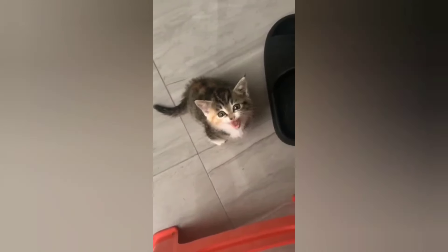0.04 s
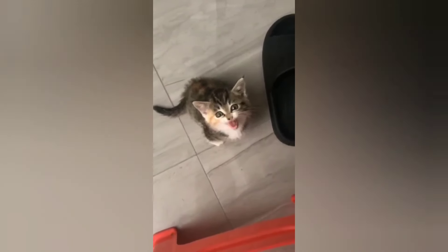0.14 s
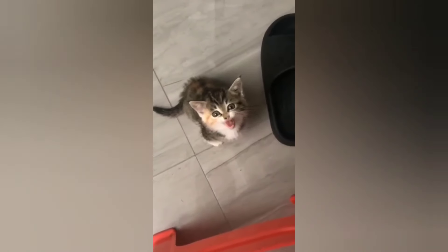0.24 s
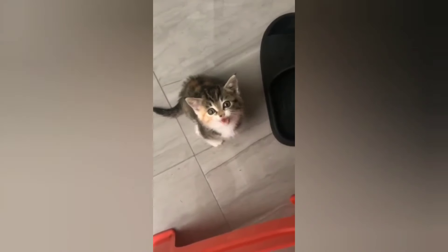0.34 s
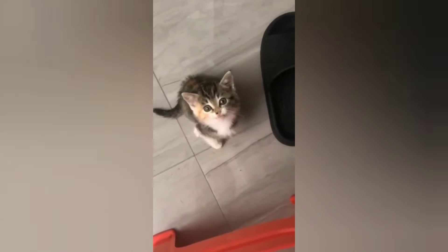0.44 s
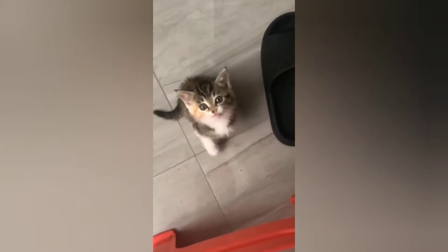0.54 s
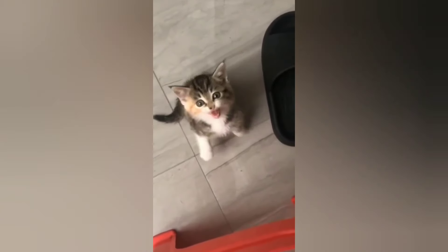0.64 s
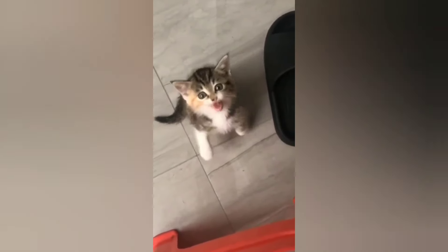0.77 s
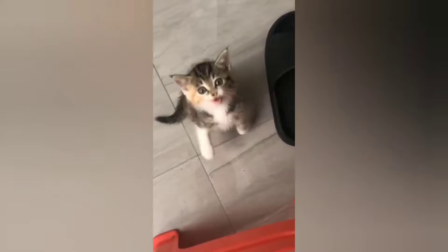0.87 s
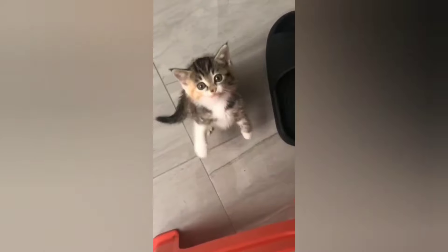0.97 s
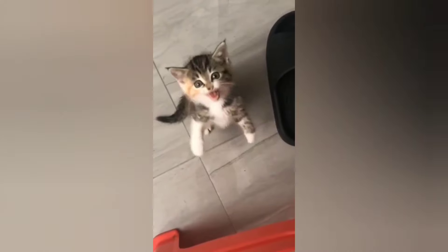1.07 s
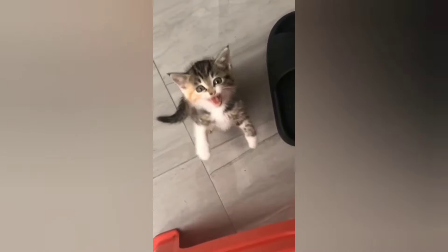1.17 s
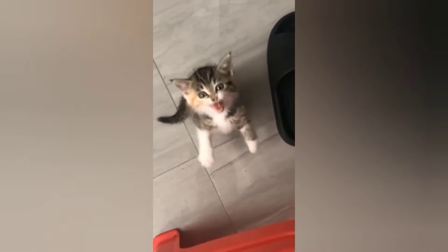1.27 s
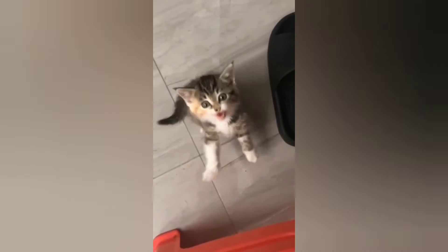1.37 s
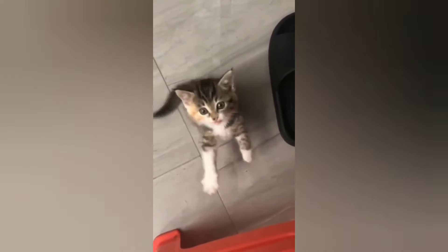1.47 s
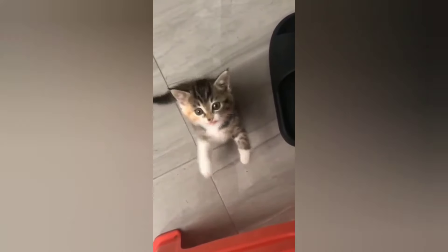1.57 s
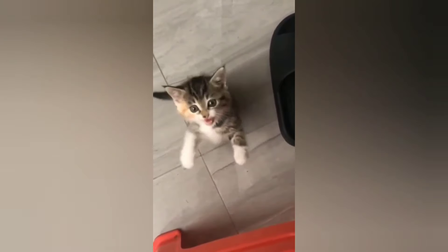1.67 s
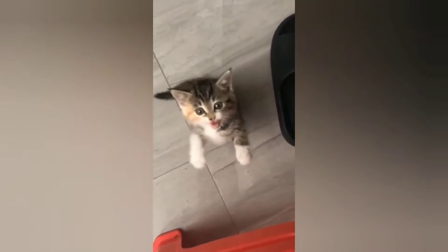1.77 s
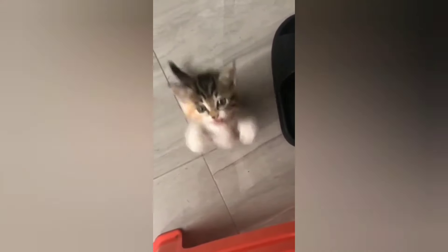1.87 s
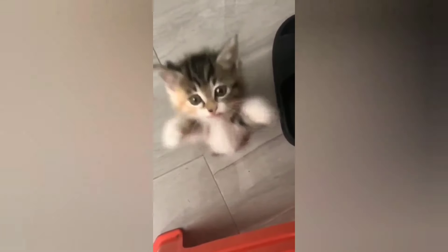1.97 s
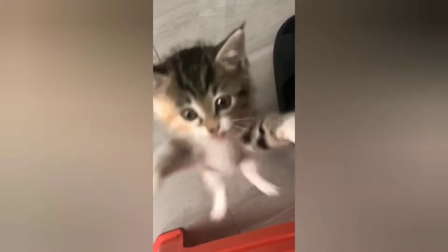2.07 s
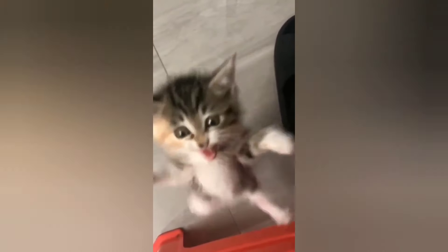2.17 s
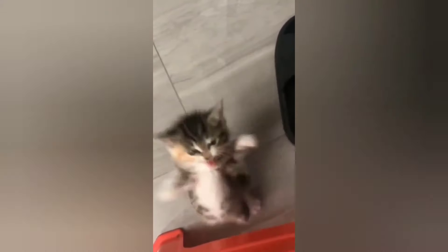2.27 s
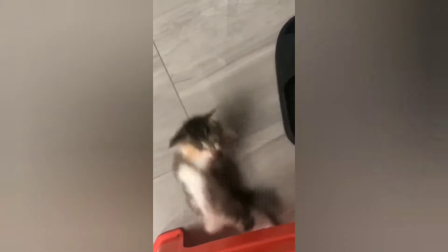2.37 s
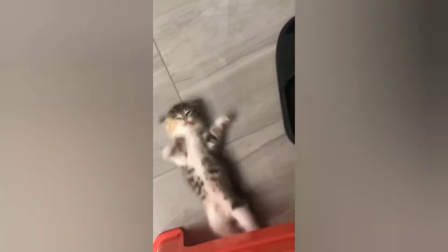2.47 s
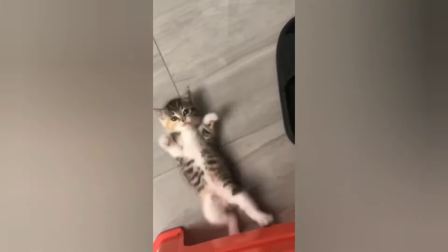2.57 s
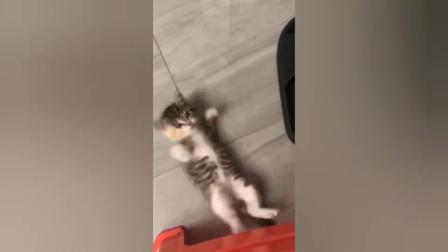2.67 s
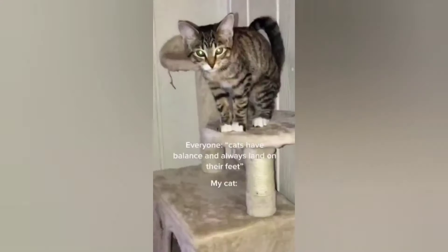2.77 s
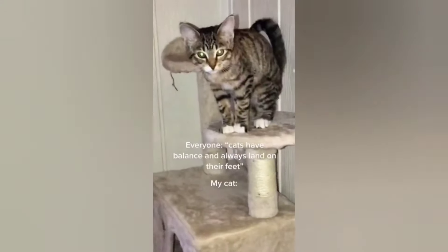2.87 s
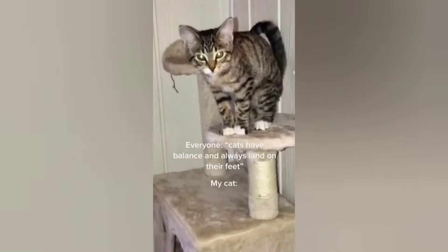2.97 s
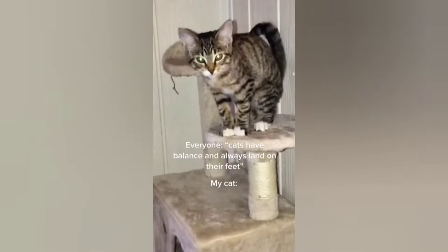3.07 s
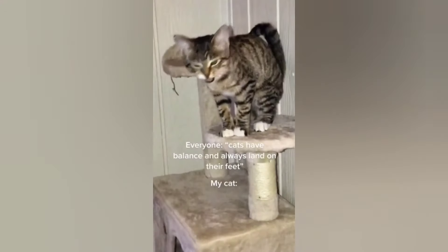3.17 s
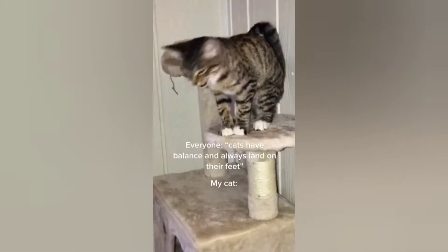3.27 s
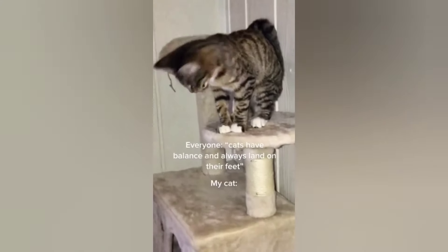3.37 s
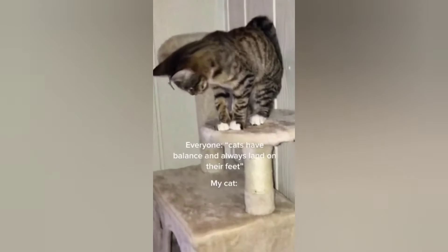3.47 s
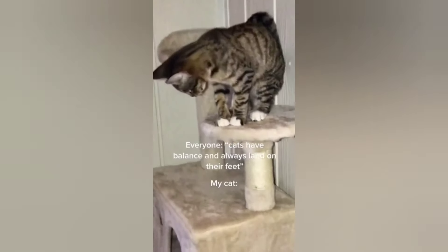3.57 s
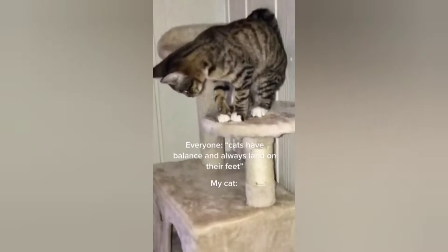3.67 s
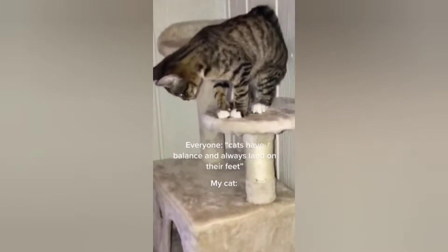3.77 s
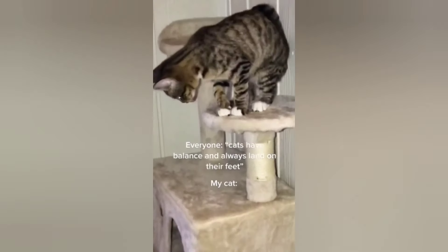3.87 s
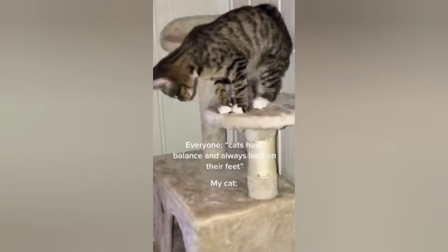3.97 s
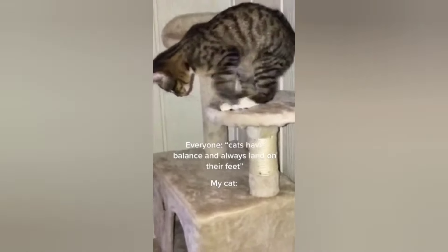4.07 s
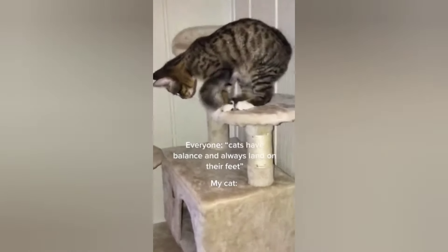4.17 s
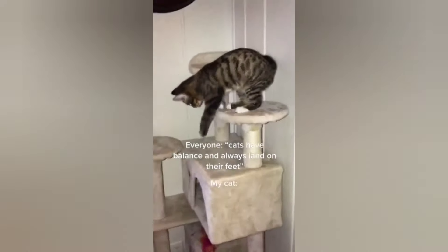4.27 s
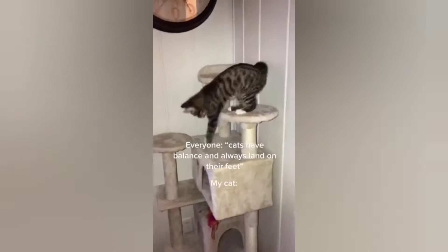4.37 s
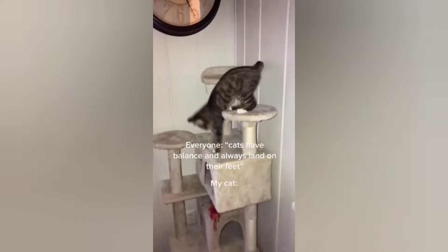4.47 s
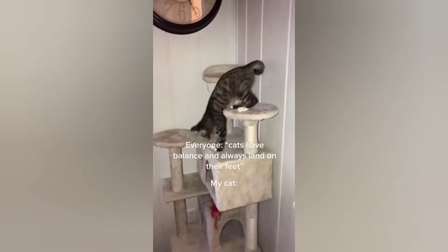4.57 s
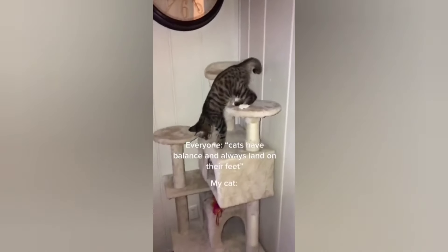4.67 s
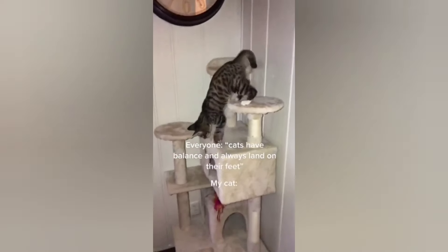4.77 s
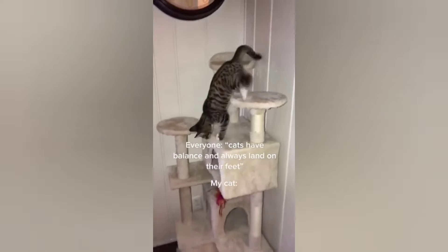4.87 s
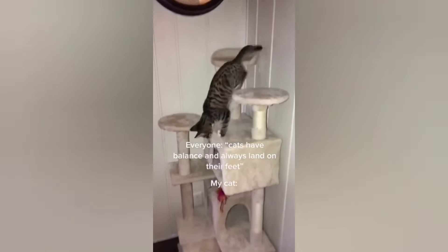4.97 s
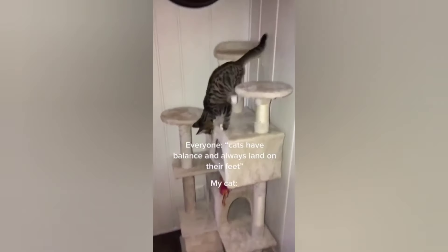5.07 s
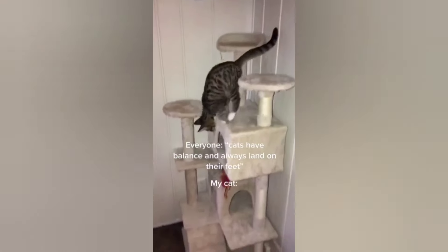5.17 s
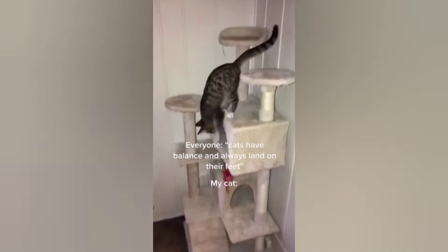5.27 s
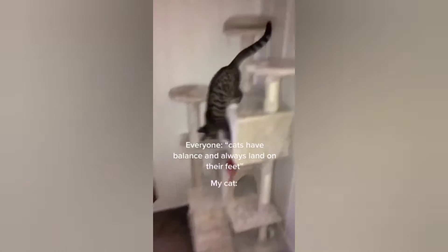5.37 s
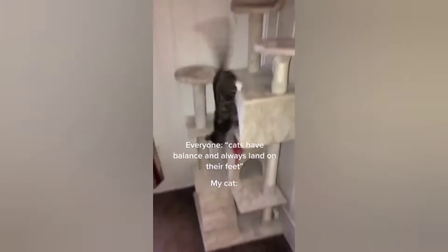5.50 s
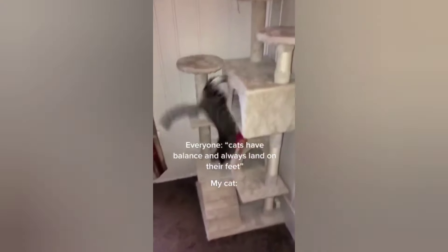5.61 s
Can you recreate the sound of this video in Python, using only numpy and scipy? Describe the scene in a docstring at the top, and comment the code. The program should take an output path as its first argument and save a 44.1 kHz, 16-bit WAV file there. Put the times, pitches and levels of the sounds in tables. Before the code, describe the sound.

Close to the microphone in a lively tiled room, a kitten gives five short, high mews, the last loudest and cracking, and lands with a soft thump. The sound cuts to a quieter, drier room: one faint cat meow, a slight rustle, then a burst of padded knocks and claw scrapes.

```python
"""A kitten close to the microphone on a tiled floor mews five times, leaps and lands with a soft thump.
The scene cuts to a quieter room: a grown cat meows once, faintly, shifts on a carpeted tower and knocks it.
Voices are overtones shaped by jaw, tongue and fixed resonances, with breath noise on each vocal cycle.
Blows are decaying sines with a crack of noise, and fur and claws are bursts of uneven noise.
Each room adds a floor bounce, a dying tail and coloured noise; one microphone, mono."""
import sys
import numpy as np
from scipy import signal
from scipy.fft import rfft, irfft
from scipy.io import wavfile
from scipy.ndimage import uniform_filter1d

SR = 44100
rng = np.random.default_rng(int(sys.argv[2]) if len(sys.argv) > 2 else 0)


def how_loud(loudness_db):
    """Turn decibels into a plain amplitude multiplier (0 dB gives 1, 20 dB gives 10)."""
    steps = np.asarray(loudness_db, float) / 20
    return 10 ** steps


def transcribe(signal):
    """Save signal, clipped to [-1, 1], as a 16-bit WAV file at the path in sys.argv[1]."""
    frames = np.atleast_2d(signal).T
    limited = np.clip(frames, -1, 1)
    pcm = np.round(limited * 32767).astype(np.int16)
    wavfile.write(sys.argv[1], SR, pcm)


N = 248724


def rms_one(x):
    """Scale to unit power."""
    return x / np.sqrt(np.mean(x ** 2) + 1e-20)


def at_hz(points, hz):
    """Read the second column of a frequency table on a log frequency axis."""
    table_hz, value = np.transpose(points)
    return np.interp(np.log(hz + 1), np.log(table_hz), value)


def band(x, low_hz, high_hz):
    """Butterworth band-pass."""
    return signal.sosfilt(signal.butter(2, [low_hz, high_hz], "band", fs=SR, output="sos"), x)


def wobble(hz, size):
    """Slow random drift: noise low-passed at hz, scaled to unit power."""
    settle = 4000                                  # samples dropped while the filter settles
    noise = rng.standard_normal(size + settle)
    slow = signal.sosfilt(signal.butter(2, hz, fs=SR, output="sos"), noise)
    return rms_one(slow[settle:])


def peak(hz, centre_hz, width_hz):
    """Gain of one resonance, 1 at its centre."""
    return 1 / np.sqrt(1 + ((hz ** 2 - centre_hz ** 2) / (hz * width_hz)) ** 2)


def room_tone(spectrum, db, flicker_db):
    """The empty room at the microphone: coloured noise whose level flickers a little."""
    colour = how_loud(at_hz(spectrum, np.fft.rfftfreq(N, 1 / SR)))
    noise = irfft(rfft(rng.standard_normal(N)) * colour, N)
    return how_loud(db + flicker_db * wobble(1.9, size=N)) * rms_one(noise)


def room(x, t60, wet_db, floor_ms, floor_db):
    """Direct sound, a bounce off the floor, then octave bands of dying noise from the walls."""
    t = np.arange(SR) / SR
    response = 0
    for low_hz in 40 * 2. ** np.arange(9):
        noise = band(rng.standard_normal(SR), low_hz, min(2 * low_hz, 20000))
        response = response + noise * how_loud(-60 * t / at_hz(t60, np.sqrt(2) * low_hz))
    response *= np.clip(t / 0.0015 - 1, 0, 1)      # walls answer late
    response *= how_loud(wet_db) / np.sqrt(np.sum(response ** 2))
    response[0] += 1                               # direct path to the microphone
    response += how_loud(floor_db) * np.sinc(np.arange(SR) - floor_ms * SR / 1000)
    return signal.fftconvolve(x, response)[:N]


# Noise colour of the quiet room: (frequency [Hz], relative density [dB per Hz])
QUIET_ROOM_TONE = [(15, -21), (25, -22.5), (61, 3.5), (77, -7), (86, -13), (133, 3.5), (240, -10),
                   (274, 1.5), (305, -12.5), (331, -5), (482, -14.5), (722, -18), (782, -21.5),
                   (848, -19.5), (15500, -42)]
# Reverberation of the quiet room: (frequency [Hz], time to fall 60 dB [s])
QUIET_ROOM_T60 = [(250, 0.24), (1500, 0.66), (12000, 0.076)]


def quiet_room(sounds):
    """The cat's room: its tail dies fastest in the treble, over a low room tone."""
    heard = room(sounds, QUIET_ROOM_T60, wet_db=-14.0, floor_ms=0.9, floor_db=-23.0)
    return heard + room_tone(QUIET_ROOM_TONE, db=-66, flicker_db=.5)


# Noise colour of the tiled room: (frequency [Hz], relative density [dB per Hz])
TILED_ROOM_TONE = [(15, -37), (25, -13), (75, 7), (160, -9.5), (240, -3), (445, -14.5), (848, -17.5),
                   (945, -17.5), (1380, -23.5), (1900, -22.5), (2230, -39), (3000, -27.5), (3530, -28),
                   (15500, -44.5)]
# Reverberation of the tiled room: (frequency [Hz], time to fall 60 dB [s])
TILED_ROOM_T60 = [(250, 1), (1500, 0.75), (5000, 0.72), (9000, 0.46), (15000, 0.4)]


def tiled_room(sounds):
    """The kitten's room: a longer tail than the cat's at most pitches, over a louder room tone."""
    heard = room(sounds, TILED_ROOM_T60, wet_db=-13.5, floor_ms=1.2, floor_db=-21.0)
    return heard + room_tone(TILED_ROOM_TONE, db=-55, flicker_db=.5)


# Fur and claws brushing in both rooms:
# (time [s], time scale [s], level [dB], low edge [Hz], high edge [Hz])
FUR_BRUSHES = [(2.384, 0.022, -65.5, 926, 13520), (3.929, 0.075, -77, 782, 5780),
               (5.363, 0.095, -76, 1500, 11690), (5.436, 0.025, -65.5, 1200, 5970),
               (5.454, 0.007, -51, 1300, 5095), (5.469, 0.026, -62, 250, 2200),
               (5.505, 0.0063, -56, 3000, 9400), (5.53, 0.056, -68.5, 2500, 6750),
               (5.583, 0.014, -63, 2500, 6330), (5.603, 0.021, -66, 2480, 7880)]


def brushes():
    """Fur and claws brush: dense uneven grains of noise under a quick rise and slower fall."""
    out = np.zeros(N)
    for s, length_s, db, low_hz, high_hz in FUR_BRUSHES:
        u = np.arange(0, 3, 1 / (length_s * SR))   # time in units of the time scale
        unevenness = how_loud(2.4 * wobble(450, size=SR)[:len(u)])
        grains = rng.standard_normal(SR)[:len(u)] * unevenness
        swell = 2 * np.e * u * np.exp(-2 * u)
        brush = how_loud(db) * swell * rms_one(band(grains, low_hz, high_hz))
        at = round(s * SR)
        out[at:at + len(u)] += brush[:N - at]
    return out


def blows(events, modes, crack_db, crack_t60, low_hz):
    """Each padded blow strikes every mode with a strength of its own; a short crack of noise goes with it."""
    out, t = np.zeros(N), np.arange(SR // 2) / SR
    spread_db = 3 * rng.standard_normal((len(events), len(modes)))
    # a loose frame never rings twice alike
    detune = 1 + 0.0703 * rng.standard_normal((len(events), len(modes)))
    cracks = rng.standard_normal((len(events), len(t))) * how_loud(crack_db - 60 * t / crack_t60)
    for (s, db, hard_hz), own_db, own_tune, crack in zip(events, spread_db, detune, cracks):
        ring = 0
        for (hz, mode_db, t60), offset_db, tune in zip(modes, own_db, own_tune):
            ring = ring + how_loud(mode_db + offset_db - 60 * t / t60) * np.sin(2 * np.pi * hz * tune * t)
        soft = signal.butter(4, hard_hz, fs=SR, output="sos")   # a soft paw dulls the blow
        at = round(s * SR)
        out[at:at + len(t)] += how_loud(db) * signal.sosfilt(soft, ring + crack)[:N - at]
    # the blows carry no deep bass
    return signal.sosfilt(signal.butter(4, low_hz, "high", fs=SR, output="sos"), out)


# Blows on the carpeted tower: (time [s], level [dB], hardness as low-pass corner [Hz])
TOWER_KNOCKS = [(5.39, -52.5, 304), (5.5085, -28.5, 2500), (5.512, -32, 1900), (5.516, -24.5, 1500),
                (5.526, -40.5, 1200), (5.534, -41.5, 1060), (5.543, -30.5, 990), (5.572, -35, 383)]
# Ringing of the tower: (nominal frequency [Hz], mean level [dB], time to fall 60 dB [s])
TOWER_RINGING = [(146.4, -5, 0.09), (170, -5.5, 0.11), (258, -12, 0.57), (320, -5.5, 0.038),
                 (379, -5.5, 0.087), (485, -1, 0.095), (694, -5.5, 0.03), (770, -19.5, 0.043),
                 (920, -7, 0.033), (1140, -3, 0.029), (1500, -12, 0.065), (1900, -11.5, 0.03)]


def tower_knocks():
    """The slipping cat knocks the tower, whose frame rings briefly."""
    return blows(TOWER_KNOCKS, TOWER_RINGING, crack_db=7, crack_t60=.055, low_hz=112)


# Kitten's blows on the floor: (time [s], level [dB], hardness as low-pass corner [Hz])
KITTEN_LANDING = [(2.382, -37.5, 473), (2.398, -42, 450)]
# Ringing of the floor: (nominal frequency [Hz], mean level [dB], time to fall 60 dB [s])
FLOOR_RINGING = [(74, -9, 1), (153, -13, 0.35), (247, 3, 0.035), (302, -5.5, 0.048), (417, 3, 0.012)]


def landing():
    """The kitten lands on its back: two soft blows set low modes ringing."""
    return blows(KITTEN_LANDING, FLOOR_RINGING, crack_db=-6, crack_t60=.06, low_hz=55)


def breath(treble, tongue_low, tongue_high, phase):
    """Air noise puffed once a cycle: rasp around the tongue resonance, hiss in the treble ones."""
    air = rng.standard_normal((len(treble), len(phase))) * (1 + 0.35 * np.cos(phase))
    once = band(air[0], tongue_low, 1.4 * tongue_high)
    rasp = rms_one(band(once, tongue_low, 1.4 * tongue_high))
    hiss = 0
    for (hz, width, db), noise in zip(treble[1:], air[1:]):
        narrow = band(band(noise, hz - width, hz + width), hz - 1.8 * width, hz + 1.6 * width)
        hiss = hiss + how_loud(db) * rms_one(narrow)
    return rasp, rms_one(hiss)


# The voice cracks in mid-leap:
# (time [s], half length [s], rasp gained [dB], depth of the strong-weak pulse pattern [0-1])
VOICE_CRACK = (2.135, .045, 14, .2)


def voice(calls, colours, husks, by_mouth, by_sag, throat, treble, jitter, shimmer_db, count):
    """Overtones of a regular vocal pulse weighed by the throat, plus breath puffed on every cycle."""
    upper_shut_db, upper_open_db = -25, 16.5       # strength of the tongue resonance
    husk_per_octave, husk_most = 3.5, .72          # breathy share gained as the pitch sags, and its ceiling
    gape = 0.26                                    # scale of the jaw's further drop through the crack
    crack_s, crack_half_s, crack_rasp_db, crack_depth = VOICE_CRACK
    (jaw_low, jaw_high, jaw_width), (tongue_low, tongue_high, tongue_width) = throat
    out = np.zeros(N)
    for rows, (*colour, slope_db), husk in zip(calls, colours, husks):
        s, *columns = np.transpose(rows)
        start, stop = round(max(s[0], 0) * SR), round(s[-1] * SR)
        t = np.arange(start, stop) / SR
        size = len(t)
        hz, db, mouth, tongue = [np.interp(t, s, c) for c in columns]
        hz = uniform_filter1d(hz, size=600, mode="nearest")   # muscles round off the glide
        mouth = np.clip(mouth, 0, 1)
        sag = np.log2(hz.max() / hz)               # octaves below the top pitch
        late = uniform_filter1d(1. * (t > t[db.argmax()]), size=2000)   # 1 after the loudest moment

        # colour follows the mouth and the sagging pitch
        shades = []
        for base, gain, rise, fall in zip(colour, by_mouth, *by_sag):
            shades.append(base + gain * (mouth - .5) + (rise + (fall - rise) * late) * sag)
        jaw, treble_db, nose_db, rasp_db = shades
        tilted = [(f, w, d + slope_db * np.log2(f / treble[1][0])) for f, w, d in treble]
        upper_db = upper_shut_db + (upper_open_db - upper_shut_db) * mouth
        husk = np.clip(husk + husk_per_octave * sag * (1 - late / 2), 0, husk_most)
        cracked = np.exp(-((t - crack_s) / crack_half_s) ** 4 / 2)
        jaw = jaw + gape * np.cumsum(cracked) / (2 * crack_half_s * SR)
        rasp_db = rasp_db + crack_rasp_db * cracked

        # a raspy cry is less steady; slack or cracked folds waver
        hz = hz * (1 + jitter * how_loud(rasp_db / 2) * wobble(84, size))
        hz = hz * (1 + (.008 * cracked + .2 * late * sag ** 2) * wobble(40, size))
        phase = 2 * np.pi * np.cumsum(hz) / SR
        jaw_hz = jaw_low * (jaw_high / jaw_low) ** jaw
        tongue_hz = tongue_low * (tongue_high / tongue_low) ** tongue

        body, body_power, top, top_power = 0, 0, 0, 0
        for k in range(1, count + 1):
            shimmer = how_loud(shimmer_db * np.sqrt(k) * wobble(23, size))
            overtone = shimmer * np.cos(k * phase - 0.07 * k ** 2)   # higher ones lag
            # a raspy cry breaks up from the top
            overtone *= 1 + 0.66 * (k - 1) * how_loud(rasp_db) * wobble(190, size)
            # strong and weak pulses alternate
            overtone *= 1 + (k > 2) * crack_depth * cracked * np.cos(phase / 2)
            low = peak(k * hz, jaw_hz, jaw_width) ** 1.4
            low += how_loud(upper_db) * peak(k * hz, tongue_hz, tongue_width) ** 2.15
            low /= 1 + (k * hz / (1.6 * tongue_high)) ** 6   # the throat passes little above its resonances
            low += how_loud(nose_db) * (k == 1)         # the nose lets out the fundamental
            high = sum(how_loud(d) * peak(k * hz, f, w) ** 2.5 for f, w, d in tilted)
            body = body + low * overtone
            body_power = body_power + low ** 2 / 2
            top = top + high * overtone * (1 + 1.1 * husk * wobble(45, size))
            top_power = top_power + high ** 2 / 2

        rasp, hiss = breath(tilted, tongue_low, tongue_high, phase)
        first_hz, first_width, first_db = tilted[0]
        total_power = sum(how_loud(2 * d) * w for f, w, d in tilted)
        airy = 1 - how_loud(2 * first_db) * first_width / total_power   # share of the resonances that hiss
        top = np.sqrt(1 - husk) * top / np.sqrt(top_power) + np.sqrt(husk * airy) * hiss
        # 1.7 ms fades; a call starting at time zero is already sounding
        edge = np.clip(np.minimum(t - s[0] + (start == 0), s[-1] - t) / 0.0017, 0, 1)
        cry = body / np.sqrt(body_power) + how_loud(treble_db) * top + how_loud(rasp_db) * rasp
        out[start:stop] += how_loud(db) * edge * cry
    return out


# One faint meow: (time [s], pitch [Hz], level [dB], mouth opening [0-1], tongue forward [0-1])
CAT_CALLS = [
    [(3.105, 598, -79, 0.3, 0.56), (3.115, 579, -56, 0.67, 0.68), (3.14, 591, -57, 0.9, 0.48),
     (3.175, 666.5, -55.5, 0.76, 0.69), (3.23, 692, -48.5, 0.76, 0.59), (3.335, 679, -62, 0.6, 0.8),
     (3.375, 670.5, -56.5, 0.57, 0.45), (3.42, 644, -62, 0.15, 0.37), (3.46, 641, -57, 0.018, 0.89),
     (3.61, 636, -58, 0.026, 0.86), (3.69, 621, -64.5, 0.032, 1), (3.74, 591, -68, 0.27, 1),
     (3.77, 506, -71.5, .23, 0.75)],
]
# Jaw row, then tongue row: (lowest resonance [Hz], highest [Hz], width [Hz])
CAT_JAW_TONGUE = [(900, 3500, 430), (1770, 3600, 530)]
# Fixed resonances above them: (frequency [Hz], width [Hz], level before the treble slope [dB])
CAT_TREBLE_PEAKS = [(4070, 380, 17), (6070, 2300, -0.5), (8800, 800, -2.5)]
# Colour at top pitch, mouth half open:
# (jaw [0-1], treble [dB], nasal [dB], rasp against the voice [dB], treble slope [dB per octave])
CAT_COLOURS = [(0.41, -19, -8.5, -52, .1)]
# Gained from shut to open mouth: (jaw [0-1], treble [dB], nasal [dB], rasp [dB])
CAT_MOUTH_GAIN = (-0.14, 32, -23.5, 8)
# Gained per octave below top pitch, rows before and after the loudest moment:
# (jaw [0-1], treble [dB], nasal [dB], rasp [dB])
CAT_SAG_GAIN = [(-.1, 16, -21, 5), (-.1, 13, -5, 5.7)]
# Breathy share of the treble at top pitch, one per call: (share [0-1])
CAT_BREATHY = [.25]


def cat_meow():
    """The grown cat's meow: a lower pitch through narrower throat resonances than the kitten's."""
    return voice(CAT_CALLS, CAT_COLOURS, CAT_BREATHY, CAT_MOUTH_GAIN, CAT_SAG_GAIN,
                 CAT_JAW_TONGUE, CAT_TREBLE_PEAKS, jitter=0.019, shimmer_db=0.43, count=15)


# Five mews: (time [s], pitch [Hz], level [dB], mouth opening [0-1], tongue forward [0-1])
KITTEN_CALLS = [
    [(0.0, 990, -36.5, 0.52, 0.32), (0.035, 1040, -32.5, 0.9, 0.34), (0.07, 1047, -31, 0.67, 0.61),
     (0.16, 1066, -31.5, 0.87, 0.5), (0.21, 1062, -33.5, 0.82, 0.49), (0.245, 1027, -36.5, .5, 0.05),
     (0.27, 970, -38, .37, 0), (0.288, 933, -56.5, .05, .05), (0.301, 723, -52, .05, 0.4)],
    [(0.553, 770, -53, 0.4, 0.7), (0.56, 773, -47, 0.73, 0.05), (0.58, 889, -44, 0.97, 0.48),
     (0.61, 924, -38, 0.6, 0.51), (0.65, 993, -37, 0.4, 0.63), (0.73, 984, -39.5, 0.34, 0.48),
     (0.788, 916, -45, 0.07, 1), (0.802, 768, -69, 0.6, 0)],
    [(0.977, 791, -59, 0.9, 0.5), (0.986, 753, -46, 0.32, 0.18), (1.01, 858, -42.5, 0.91, 0.33),
     (1.08, 968.4, -38, 0.62, 0.59), (1.19, 1032, -35.5, 0.86, 0.53), (1.24, 1044, -31.5, 0.76, 0.47),
     (1.285, 1027, -36, 0.88, 0.35), (1.32, 965, -39, 0.33, 0), (1.34, 900, -49, 0.02, .05),
     (1.351, 640, -53, 0, 0.3)],
    [(1.565, 674, -68, 0.1, 0.05), (1.575, 754, -47.5, 0.2, 0), (1.6, 787, -44, 0.78, 0.26),
     (1.64, 894.5, -41.5, 0.8, 0.4), (1.73, 929.4, -41, 0.49, 0.93), (1.78, 942.5, -42, 0.65, 0.4),
     (1.815, 915.6, -43, 0.44, 0.71), (1.84, 835, -50.5, .1, 0.2), (1.855, 730, -63.5, 0.7, 0.5)],
    [(2.043, 691, -56.5, .5, 0.8), (2.052, 728, -40.5, 0.64, 0.25), (2.068, 957, -29.5, 0.66, 0.4),
     (2.095, 914, -26, 0.52, 0.51), (2.13, 925, -24, 0.6, 0.57), (2.16, 893, -23.5, 0.86, 0.63),
     (2.2, 932, -38.5, 0.72, 0.83), (2.245, 971, -39.5, 0.7, 0.84), (2.275, 933, -41.5, 0.82, 0.7),
     (2.305, 880, -42, 0.66, 0.56), (2.335, 844.5, -46.5, .9, 0.16), (2.385, 920, -60, 0, 0)],
]
# Jaw row, then tongue row: (lowest resonance [Hz], highest [Hz], width [Hz])
KITTEN_JAW_TONGUE = [(1200, 3100, 897), (2900, 5870, 800)]
# Fixed resonances above them: (frequency [Hz], width [Hz], level before the treble slope [dB])
KITTEN_TREBLE_PEAKS = [(6300, 500, -3), (7500, 600, 2), (9700, 700, -6), (13400, 1500, -3)]
# Colour of each mew at top pitch, mouth half open:
# (jaw [0-1], treble [dB], nasal [dB], rasp against the voice [dB], treble slope [dB per octave])
KITTEN_COLOURS = [(.55, -20, -18, -46, -0.5), (0.51, -16.5, -19, -43.5, 14), (0.53, -15.5, -17, -45.5, -1),
                  (0.5, -20.5, -15, -42, 11.5), (0.4, -14, -16, -35.5, -4.5)]
# Gained from shut to open mouth: (jaw [0-1], treble [dB], nasal [dB], rasp [dB])
KITTEN_MOUTH_GAIN = (0.067, 1.5, 1.2, .1)
# Gained per octave below top pitch, rows before and after the loudest moment:
# (jaw [0-1], treble [dB], nasal [dB], rasp [dB])
KITTEN_SAG_GAIN = [(-.7, -3, 23, 34), (-.5, -16, 48.5, 36.5)]
# Breathy share of the treble at top pitch, one per mew: (share [0-1])
KITTEN_BREATHY = [.02, .62, .05, .72, .4]


def kitten_mews():
    """The kitten's mews: a high pitch through a small throat, the last one cracking in mid-leap."""
    return voice(KITTEN_CALLS, KITTEN_COLOURS, KITTEN_BREATHY, KITTEN_MOUTH_GAIN, KITTEN_SAG_GAIN,
                 KITTEN_JAW_TONGUE, KITTEN_TREBLE_PEAKS, jitter=0.025, shimmer_db=0.9649, count=16)


def scene():
    """Two rooms, one after the other, joined by a fade of a few milliseconds."""
    cut_s, fade_s = 2.693, 0.0085
    first = np.clip((cut_s - np.arange(N) / SR) / fade_s, 0, 1)
    fur = brushes()
    tiled = tiled_room(kitten_mews() + landing() + fur)
    cat = cat_meow() + tower_knocks() + fur
    quiet = quiet_room(cat * (1 - first))          # only sounds after the cut enter this room
    return (first * tiled + (1 - first) * quiet)[None]


def top_cut(x):
    """Nothing passes above the cut-off."""
    return signal.sosfilt(signal.butter(12, 15730, fs=SR, output="sos"), x)


def record(dry):
    """The finished mix as it is delivered."""
    return top_cut(dry)


dry = scene()
out = record(dry)
transcribe(out)
```